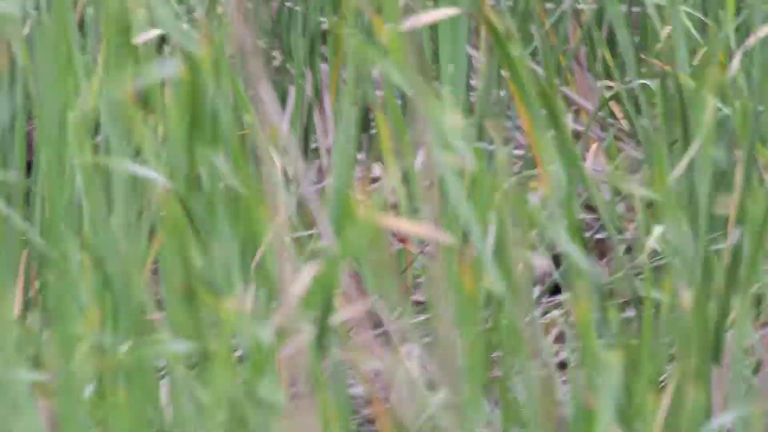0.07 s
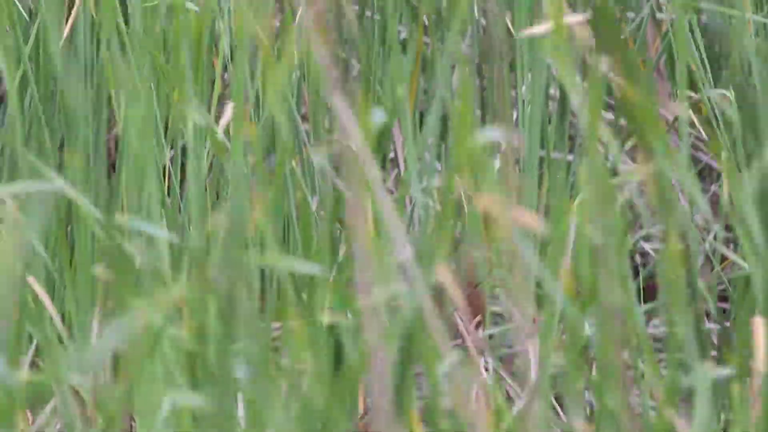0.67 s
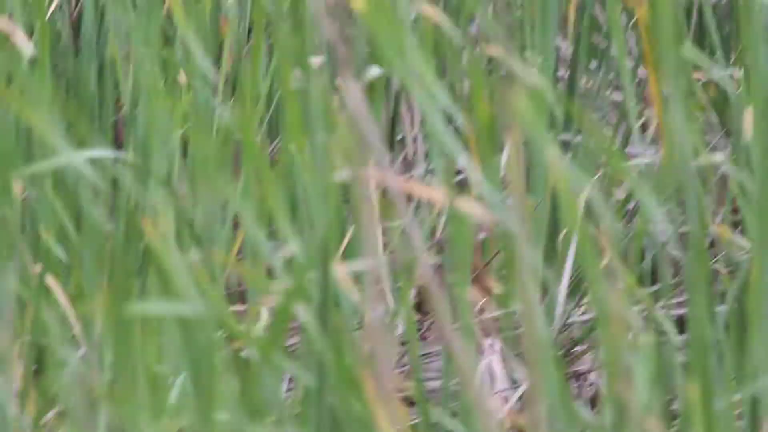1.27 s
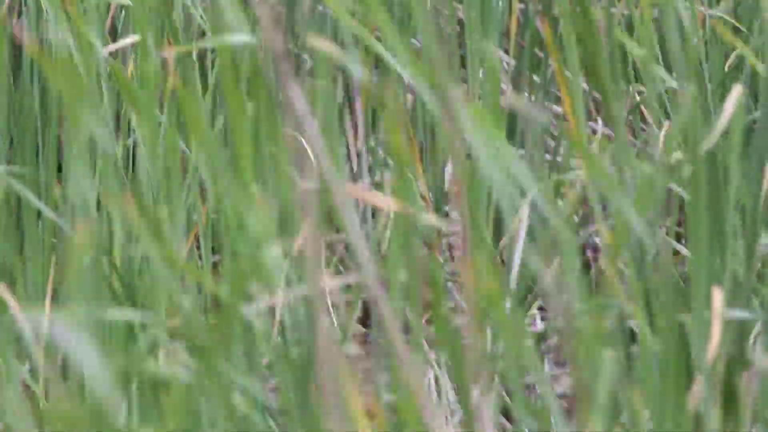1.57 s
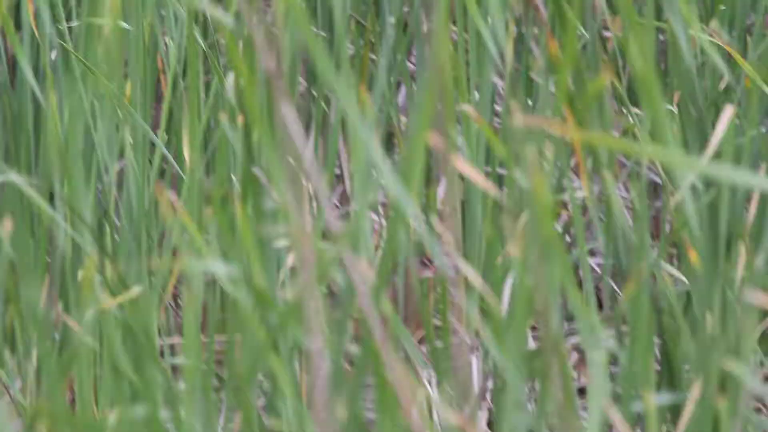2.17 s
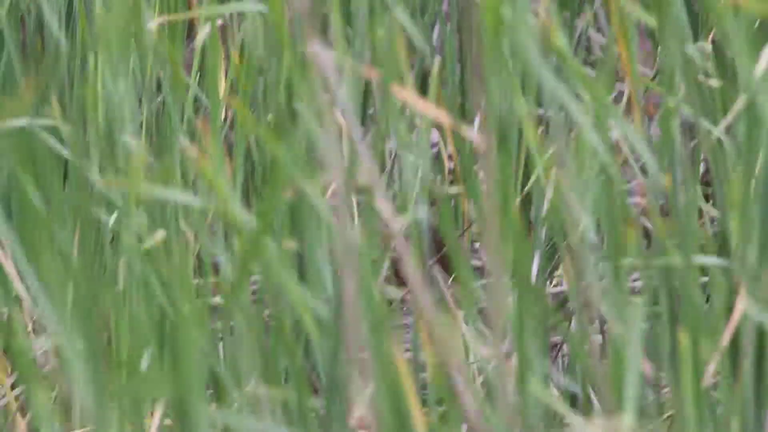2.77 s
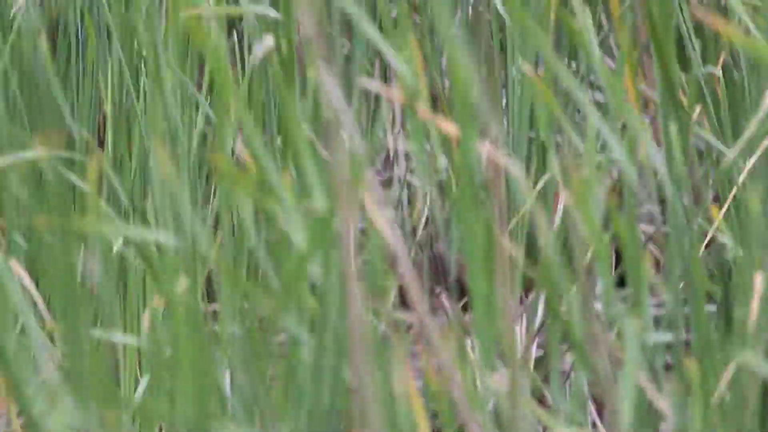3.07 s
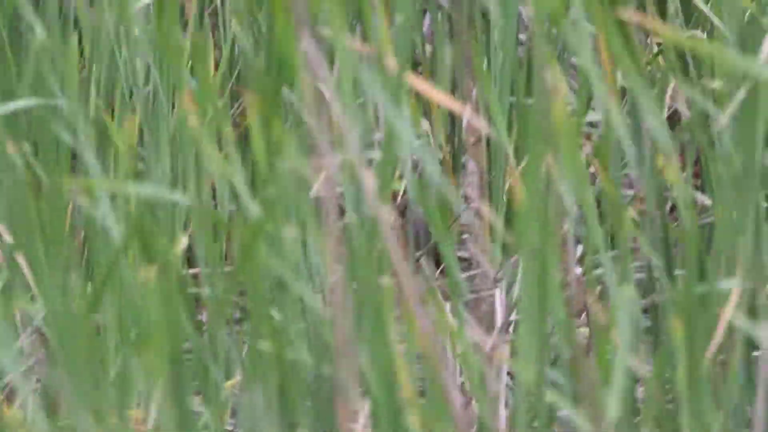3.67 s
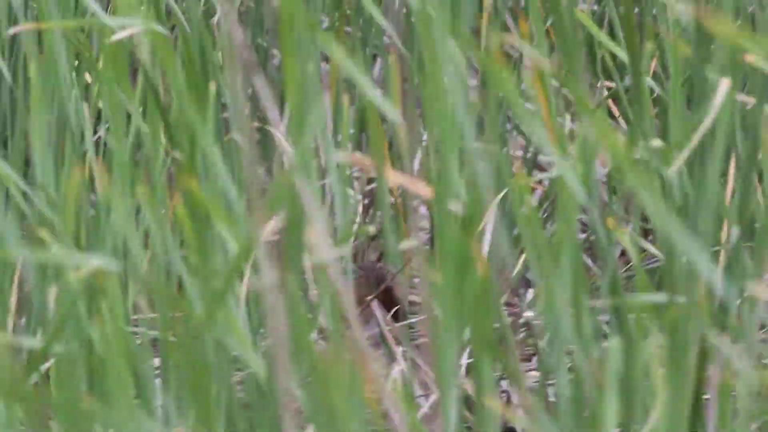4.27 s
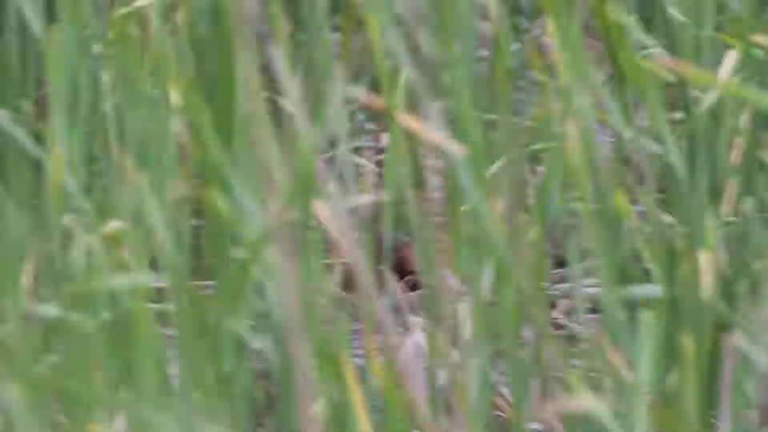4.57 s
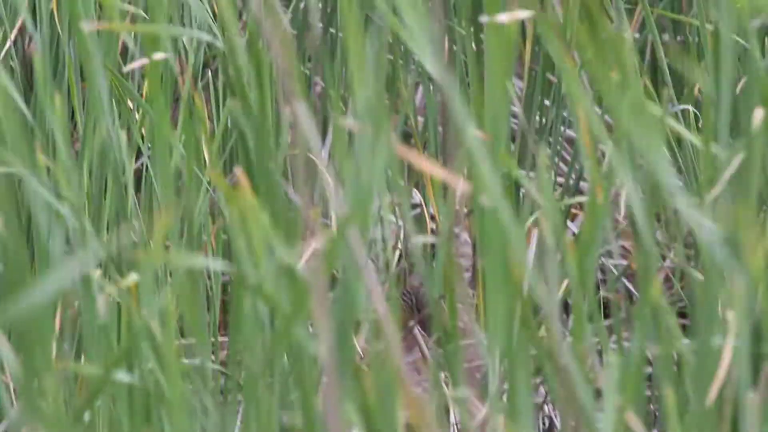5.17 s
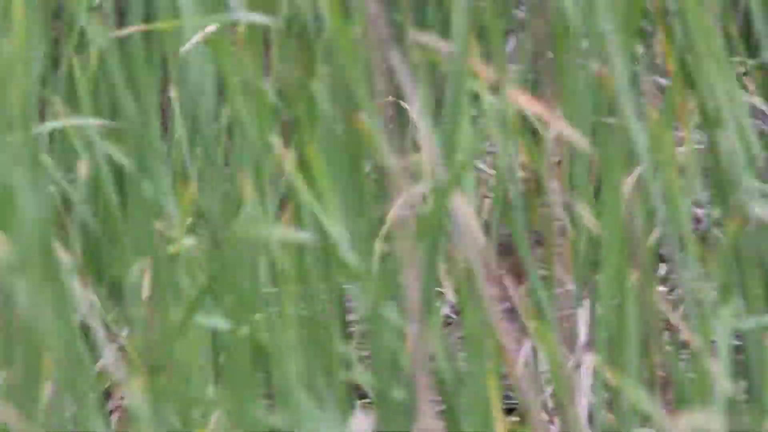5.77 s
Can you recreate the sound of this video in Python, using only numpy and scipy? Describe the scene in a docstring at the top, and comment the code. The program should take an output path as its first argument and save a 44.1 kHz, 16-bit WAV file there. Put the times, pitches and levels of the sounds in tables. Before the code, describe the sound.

A soft, steady rush of a reed marsh runs throughout the six seconds. A marsh bird gives four short, sharp clicking calls at about 0.2, 0.7, 1.1 and 1.7 seconds, each with a quick scattered echo. A lower, hoarser fifth call comes at 2.8 seconds. Low wind gusts thump the microphone between 0.6 and 1 second, then ease. Smaller birds farther off give faint falling chirps and thin whistles, clearest around 3.5 seconds and busier again after 5.4 seconds. At 3.8 seconds a hard gust hits the microphone; the background rush dips and then recovers, while the wind keeps rumbling and buffeting almost without a break until the end. Two tiny dry ticks occur near 0.5 and 2.3 seconds, and one faint sharp click at 5.4 seconds.

```python
"""A rail in a windy reed bed

A rail, a marsh bird, gives four sharp "kek" calls and a lower, hoarser fifth. Each is six snaps of its
voice box ringing its throat, and the reeds scatter it into echoes. Small birds farther off add falling
chirps and thin whistles over the rush of the marsh, which ducks after a hard gust and then recovers.
Gusts buffet the microphone, now and then at first and almost without a break in the last seconds.
Two small dry ticks and one sharp click are also heard."""
import sys
import numpy as np
from scipy import signal
from scipy.fft import rfft, irfft
from scipy.io import wavfile
from scipy.ndimage import uniform_filter1d, map_coordinates

SR = 44100
rng = np.random.default_rng(int(sys.argv[2]) if len(sys.argv) > 2 else 0)


def put_to_file(sound):
    """Save the sound as 16-bit audio at rate SR, in the file named by the first command-line argument."""
    columns = np.atleast_2d(sound).T  # one column per channel
    safe = np.clip(columns, -1, 1)
    whole_steps = np.round(safe * 32767)
    wavfile.write(sys.argv[1], SR, whole_steps.astype(np.int16))


N = 266364
TIME, FREQS = np.arange(N) / SR, np.fft.rfftfreq(N, 1 / SR)


def amp(db):
    """Turns decibels into a number to multiply a sound by."""
    return 10 ** (np.asarray(db) / 20)


def unit(x):
    """Scales a sound to an average power of 1."""
    return x / np.sqrt(np.mean(x ** 2) + 1e-20)


def read(points, hz):
    """Reads between the rows of a (frequency, value) table, on a log-frequency scale."""
    table_hz, value = np.transpose(points)
    return np.interp(np.log(hz + 1), np.log(table_hz + 1), value)


def add(mix, start_s, sound):
    """Mixes a sound in at a given time."""
    part = mix[max(round(start_s * SR), 0):][:len(sound)]
    part += sound[:len(part)]


def band(x, low_hz, high_hz):
    """Keeps the part of a full-length sound between two frequencies."""
    return irfft(rfft(x) * (FREQS > low_hz) * (FREQS < high_hz), N)


def colour(x, points, size=2048):
    """Shapes the tone by a (frequency_hz, level_db) table, keeping sudden starts sharp."""
    log_gain = np.log(amp(read(points, abs(np.fft.fftfreq(size, 1 / SR)))))
    taps = np.fft.ifft(np.exp(np.conj(signal.hilbert(log_gain)))).real
    return signal.fftconvolve(x, taps[:size // 2])[:len(x)]


def resonate(x, hz, width_hz):
    """Makes a sound ring around one frequency."""
    return signal.lfilter(*signal.iirpeak(hz, hz / width_hz, SR), x)


def drift(length, hz):
    """A smooth random wobble, about 1 in size, that changes about hz times a second."""
    knots = rng.standard_normal(4096)
    return map_coordinates(knots, [np.arange(length) * hz / SR], order=3, mode="wrap")


def marsh(gain_db=1, split_hz=3000):
    """A dull far rush and a hiss of leaves; both grow, duck after the hard gust at 3.8 s, and recover."""
    # Background level over time: time_s, rush_db, leaves_db
    levels = [(0.3, -40.5, -63), (1.37, -40, -63), (2.07, -41, -64), (2.43, -39, -62.5), (2.78, -38, -63.5),
              (3.19, -36.5, -61.5), (3.66, -37, -61.5), (3.85, -40.5, -65.5), (3.99, -44.5, -69),
              (4.3, -43, -69), (5.29, -35, -64.5), (6.04, -33.5, -63)]
    # Its overall tone: frequency_hz, level_db
    tone = [(30, -0.5), (100, -5), (250, -2), (500, -2), (700, -4.5), (1100, -5.5), (2000, -6.5),
            (2800, -9.5), (3600, -13), (5000, -14), (7000, -15), (10000, -19.5), (13000, -26),
            (16000, -30.5)]
    # Bumps and dips in that tone: centre_hz, width_hz, gain_db
    bumps = [(869, 120, 3.5), (1097, 44, 5), (1413, 225, -2), (1800, 330, 3)]
    time_s, rush_db, leaves_db = np.transpose(levels)
    bumps_db = sum(db * np.exp(-(2 * (FREQS - hz) / width) ** 2) for hz, width, db in bumps)
    spectrum = rfft(rng.standard_normal(N)) * amp(read(tone, FREQS) + bumps_db)
    treble_share = FREQS ** 4 / (FREQS ** 4 + split_hz ** 4)
    whole = irfft(spectrum, N)
    rush = irfft(spectrum * (1 - treble_share), N) / band(whole, 900, 2300).std()
    leaves = irfft(spectrum * treble_share, N) / band(whole, 5500, 14000).std()
    rush *= amp(np.interp(TIME, time_s, rush_db) + .5 * drift(N, 12))
    leaves *= amp(np.interp(TIME, time_s, leaves_db))
    return amp(gain_db) * (rush + leaves)


def gust_level(rise_db_per_s=1411, fall_db_per_s=290, lull_db=-41.5):
    """The wind's strength in dB: each gust strikes quickly, holds, and dies away to a lull."""
    # Gusts on the microphone: start_s, hold_s, level_db
    gusts = [(0.052, 0.016, -17), (0.411, 0.026, -24.5), (0.564, .1, -11.5), (0.752, 0.061, -28.5),
             (0.859, .115, -11.5), (1.007, .035, -14.5), (1.141, 0.066, -25.5), (1.322, 0.04, -26),
             (1.507, 0.031, -27.5), (2.701, 0.054, -29), (2.802, 0.0074, -18.5), (3.101, 0.011, -19),
             (3.214, 0.012, -24.5), (3.443, 0.045, -26.5), (3.553, 0.047, -26), (3.758, 0.042, -8.5),
             (3.851, 0.25, -14.5), (4.15, 0.39, -20), (4.497, 0.26, -26.5), (4.694, 0.35, -17),
             (5.102, 0.4, -16.5), (5.598, 0.54, -14.5)]
    gust_db = np.full(N, lull_db)
    for start_s, hold_s, level_db in gusts:
        before_s = np.maximum(start_s - TIME, 0)
        after_s = np.maximum(TIME - start_s - hold_s, 0)
        gust_db = np.maximum(gust_db, level_db - rise_db_per_s * before_s - fall_db_per_s * after_s)
    return gust_db


def lesser_eddies(gust_db, per_s=18, pitch_hz=155, swing_db=7.5, thump_db=-18.5):
    """Lists loosely spaced eddies (swirls of air) whose strength follows the wind that carries them."""
    slip, size, detune = rng.standard_normal((256, 3)).T
    times = (np.arange(len(slip)) + .3 * slip) / per_s
    levels = np.interp(times, TIME, gust_db) + 1.5 * size
    rows = zip(times, levels + swing_db, pitch_hz * 2 ** (0.18 * detune), levels + thump_db)
    return [row for row in rows if 0 < row[0] < TIME[-1]]


def wind(flow_db=-2, lumpy_db=2, buffet_db=3, thump_hz=600):
    """Churning air rumbles on the microphone; each eddy adds a swing of pressure and a crisp thump."""
    # The rumble's tone: frequency_hz, level_db
    tone = [(15, -29), (30, -6), (55, 2), (90, 5), (150, 1), (250, -9), (350, -16.5), (500, -22),
            (700, -41.5), (1000, -46), (1600, -79), (3000, -110)]
    # The hardest eddies: time_s, level_db, pitch_hz, thump_db
    hard_eddies = [(0.087, -10, 150, -37), (0.601, -3.5, 152, -12.5), (0.874, -2, 165, -22),
                   (2.814, -10.5, 148, -35), (3.122, -8, 168, -43), (3.796, 0, 147, -12),
                   (3.88, 4, 137, -35), (3.967, 1, 179, -23), (4.102, -2.5, 198, -38),
                   (4.192, -1, 178, -23), (4.279, -3.5, 150, -30), (4.352, -4.5, 213, -41),
                   (4.424, -3.5, 190, -29), (4.726, -4.5, 141, -25), (4.794, 2.5, 176, -14),
                   (5.25, 3.5, 218, -26), (5.405, -5.5, 164, -15.5), (5.607, 4.5, 238, -32)]
    gust_db = gust_level()
    flow = unit(irfft(rfft(rng.standard_normal(N)) * amp(read(tone, FREQS)), N))
    flow /= np.sqrt(uniform_filter1d(flow ** 2, size=1100) + 1e-3)  # evens out the loudness
    surges = amp(lumpy_db * drift(N, 70) + buffet_db * drift(N, 35))
    flow = unit(flow * surges) * amp(gust_db + flow_db)
    eddies, phases = np.zeros(N), 2 * np.pi * rng.random(512)
    for (time_s, level_db, pitch_hz, thump_db), phase in zip(hard_eddies + lesser_eddies(gust_db), phases):
        centre = round(time_s * SR)
        near = slice(max(centre - SR // 30, 0), centre + SR // 30)
        t = TIME[near] - time_s
        cycles, thump_cycles = t * pitch_hz, t * thump_hz
        swing = (1 - 2j * np.pi * cycles / 2.86) ** -3.6  # strong in the middle, soft at the edges
        thump = np.exp(-(thump_cycles / 0.99) ** 2) * np.sin(2 * np.pi * thump_cycles)
        eddies[near] += amp(level_db) * (swing * np.exp(1j * phase)).real + amp(thump_db) * thump
        flow[near] *= 1 - 0.25 * np.exp(-(cycles / 0.68) ** 2)  # the eddy pushes smaller ones aside
    fade_out = np.clip((TIME[-1] - TIME) / .004, 0, 1)
    return (flow + eddies) * fade_out


def ticks_and_click():
    """Two small dry ticks and one sharp click, like a cut in the sound; each is a snap of noise."""
    # The two ticks, then the click: start_s, peak_db, centre_hz, decay_ms
    snaps = [(0.474, -33, 3100, 2.5), (2.288, -37, 6600, 3.6), (5.4232, -29.5, 7000, 0.048)]
    out, t = np.zeros(N), np.arange(SR // 40) / SR
    for start_s, peak_db, centre_hz, decay_ms in snaps:
        burst = rng.standard_normal(len(t)) * np.exp(-1000 * t / decay_ms)
        snap = resonate(burst, centre_hz, 0.4 * centre_hz)
        add(out, start_s, amp(peak_db) * snap / abs(snap).max())
    return out


def whistle(pitch_hz, level_db, octave_db=-35):
    """A slightly unsteady tone on a pitch curve; it swells late, and its octave grows toward the end."""
    count = len(pitch_hz)
    progress = np.linspace(0, 1, count)
    phase = 2 * np.pi * np.cumsum(pitch_hz * (1 + 0.017 * drift(count, 600))) / SR
    swell = (0.4 + 0.58 * np.sin(np.pi * progress ** 1.92) ** 2) * signal.windows.tukey(count, .25)
    tone = np.sin(phase) + amp(octave_db) * progress ** 2 * np.sin(2 * phase)
    return swell * amp(level_db + 4 * drift(count, 300)) * tone


def small_birds(second_pitch_share=0.8, second_length_share=0.45, whistle_rise=0.03):
    """Two-voiced chirps that hold their pitch and then drop away, and thin rising whistles."""
    # Falling chirps: start_s, length_s, first_hz, last_hz, level_db (relative)
    chirps = [(0.325, .037, 4360, 3360, -49), (0.473, .034, 4300, 3680, -52),
              (2.179, 0.043, 4390, 3160, -41), (2.477, 0.047, 5100, 2670, -41.5),
              (3.463, 0.044, 4810, 2900, -28.5), (3.599, .06, 4740, 3100, -37.5),
              (3.76, 0.051, 4730, 3140, -37.5), (4.022, 0.054, 4800, 3300, -50),
              (4.28, .05, 4630, 2900, -52), (4.595, 0.036, 4190, 3200, -46.5),
              (4.88, 0.046, 4170, 3040, -46), (5.198, 0.027, 5260, 4600, -44.5),
              (5.302, .024, 3680, 3150, -50), (5.462, 0.04, 4400, 3230, -46.5),
              (5.54, 0.054, 5140, 3170, -35.5), (5.577, 0.038, 4480, 4030, -39),
              (5.681, .052, 5230, 3000, -39.5), (5.802, 0.05, 5230, 2770, -37),
              (5.919, 0.059, 5100, 2470, -41.5), (5.999, 0.029, 4750, 4000, -43)]
    # Whistles from farther off: start_s, length_s, pitch_hz, level_db (relative)
    whistles = [(2.385, 0.059, 3600, -52), (3.35, 0.11, 3210, -43.5), (4.993, 0.037, 3470, -43),
                (5.625, 0.162, 3350, -42)]
    out = np.zeros(N)
    for start_s, length_s, first_hz, last_hz, level_db in chirps:
        progress = np.linspace(0, 1, round(length_s * SR))
        falling_hz = first_hz + (last_hz - first_hz) * progress ** 3.3
        octave_db = -15.5 + 0.56 * (level_db + 31.5)  # louder chirps are brighter
        add(out, start_s, whistle(falling_hz, level_db, octave_db))
        # The other side of the voice box opens the chirp with a short, lower note.
        second_hz = np.full(round(second_length_share * len(progress)), second_pitch_share * first_hz)
        add(out, start_s, whistle(second_hz, level_db - 7))
    for start_s, length_s, pitch_hz, level_db in whistles:
        rising_hz = pitch_hz * np.linspace(1, 1 + whistle_rise, round(length_s * SR))
        add(out, start_s, whistle(rising_hz, level_db))
    return out


def reeds(x, near_db, far_db, near_decay_s):
    """Nearby stems throw back a quick spray of echoes; the wider bed adds a faint tail."""
    # Time the tail takes to fade by 60 dB: frequency_hz, fade_s
    fade_times = [(500, .5), (3000, .5), (5000, .52), (10000, .28), (16000, .2)]
    # The echoes' tone: frequency_hz, level_db
    tone = [(500, 1), (1800, -2), (3100, -11), (3800, -12), (4400, -4), (6000, -4), (8000, -10.5),
            (16000, -1)]
    t = np.arange(SR // 2) / SR
    spray = rng.standard_normal(len(t)) * (rng.random(len(t)) < .15)
    near = spray * (1 - np.exp(-(t / 0.0041) ** 2)) * np.exp(-t / near_decay_s)
    wash = rng.standard_normal(len(t)) * (1 - np.exp(-t / 0.0035))
    hz, time_s, bands = signal.stft(wash, SR, nperseg=256)
    bands *= amp(-60 * time_s / read(fade_times, hz)[:, None])
    far = signal.istft(bands, SR, nperseg=256)[1][:len(t)]
    far *= 1 - (t / t[-1]) ** 4  # the tail dies out fully
    echoes = amp(near_db) * near / np.linalg.norm(near) + amp(far_db) * far / np.linalg.norm(far)
    return signal.fftconvolve(x, colour(echoes, tone))[:N]


def kek(level_db, spacing_ms, main_hz, upper_hz, upper_db, rasp_db, low_db, tilt_db_per_octave):
    """Six snaps of the rail's voice box, each with a puff of noise, ring its throat."""
    # Strength of each snap in turn: level_db
    snap_levels = [-6, -0.5, 1, 1, -1, -7]
    # Tone of the throat's hiss: frequency_hz, level_db
    rasp_tone = [(500, -38), (1200, -23), (2000, -8), (2600, 9.5), (3400, 2), (3900, 1.5), (5400, -6.5),
                 (7700, -3.5), (8800, -11.5), (13000, -19), (16000, -33)]
    t = np.arange(SR // 16) / SR
    snaps, puffs = np.zeros((2, len(t)))
    for k, snap_db in enumerate(snap_levels):
        start_s = k * (1 + 0.006 * rng.standard_normal()) * spacing_ms / 1000
        add(snaps, start_s, amp([snap_db]))
        puff_db = snap_db if k else snap_db - 9  # the first snap is nearly clean
        puffs += amp(puff_db) * (t >= start_s) * np.exp(-abs(t - start_s) / 0.003)
    air = puffs * rng.standard_normal(len(t))
    drive = snaps + 0.039 * air
    main = unit(resonate(resonate(drive, main_hz, 590), main_hz, 820))
    upper = unit(resonate(resonate(drive, upper_hz, 470), upper_hz, 730))
    low = unit(resonate(resonate(drive, 1770, 540), 2480, 610))
    tilted = [(hz, db + tilt_db_per_octave * np.log2(max(hz / 3000, 1))) for hz, db in rasp_tone]
    hiss = unit(colour(snaps + 0.26 * air, tilted))
    voice = main + amp(upper_db) * upper + amp(low_db) * low + amp(rasp_db - 4.5) * hiss
    return amp(level_db - 8) * unit(voice)


def rail(bounce_s=0.00189, bounce_db=-6):
    """The rail's five calls, each followed at once by its bounce off the ground."""
    # The calls and how the throat rings in each (levels are relative):
    # start_s, level_db, spacing_ms, main_hz, upper_hz, upper_db, rasp_db, low_db, tilt_db_per_octave
    calls = [(0.208, -14.5, 4.25, 2940, 7000, -38, 3.5, -18, -2),
             (0.677, -16.5, 5.26, 3110, 7530, -20, 2, -33, 0),
             (1.1374, -16.5, 4.73, 3160, 4170, -9, 4, -28, 0),
             (1.6910, -17, 4.95, 3200, 4300, -10.5, 3, -10.5, -2),
             (2.8250, -22, 5.3, 2480, 4900, 0.5, 14.5, 6.5, -6)]
    out = np.zeros(N)
    for start_s, *call in calls:
        sound = kek(*call)
        add(out, start_s, sound)
        add(out, start_s + bounce_s, amp(bounce_db) * sound)
    return out


def scene():
    """Mixes the birds and their echoes with the ticks, click, wind and marsh in one channel."""
    keks, chirps = rail(), small_birds()
    keks = keks + reeds(keks, near_db=0, far_db=-7, near_decay_s=.017)
    chirps = chirps + reeds(chirps, near_db=-10, far_db=-7, near_decay_s=.012)
    return (keks + amp(1.5) * chirps + ticks_and_click() + wind() + marsh())[None]


def record(dry, start_s=.0725, ceiling=1.02, cutoff_hz=16100):
    """Opens after a moment of silence, rounds off the hardest eddies and cuts the highest treble."""
    opened = dry * np.clip((TIME - start_s) / .002, 0, 1)
    rounded = opened / (1 + (opened / ceiling) ** 8) ** (1 / 8)
    treble_cut = signal.firwin(511, cutoff_hz, window=("kaiser", 9), fs=SR)
    return signal.oaconvolve(rounded, treble_cut[None], "same")


dry = scene()
out = record(dry)
put_to_file(out)
```